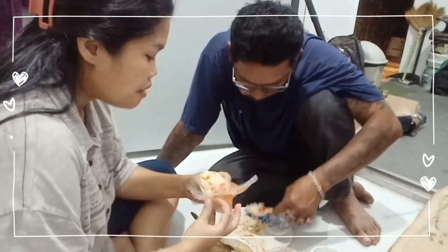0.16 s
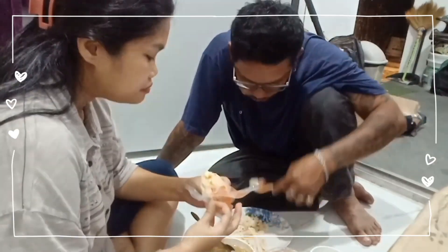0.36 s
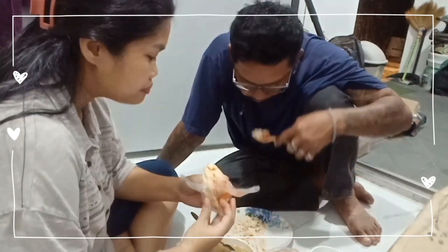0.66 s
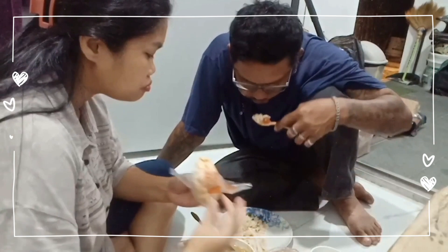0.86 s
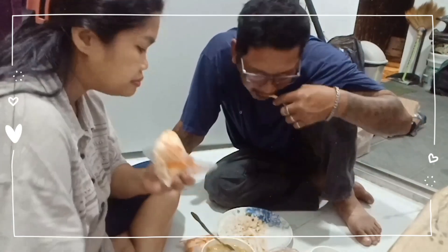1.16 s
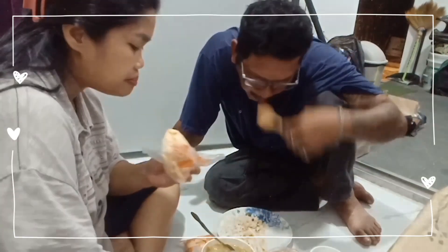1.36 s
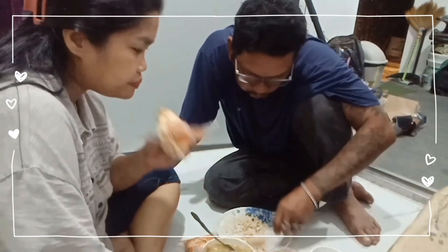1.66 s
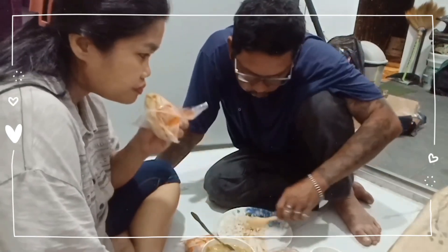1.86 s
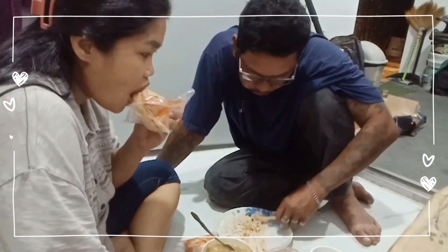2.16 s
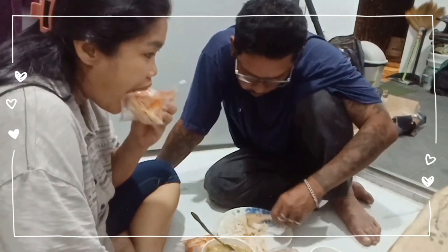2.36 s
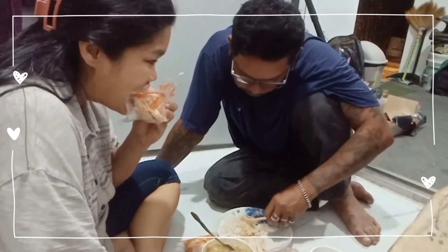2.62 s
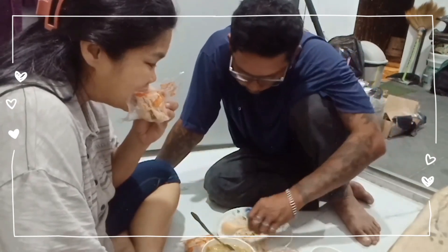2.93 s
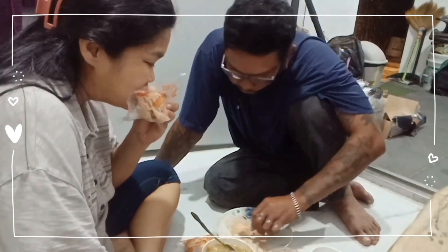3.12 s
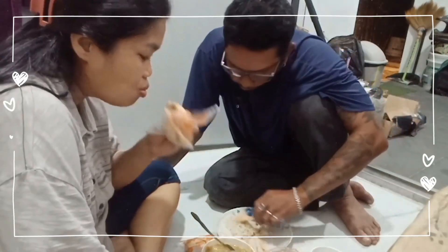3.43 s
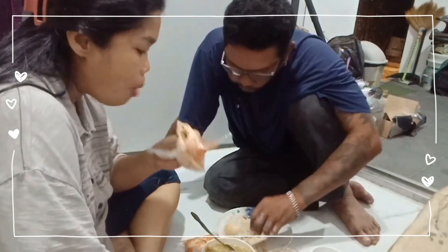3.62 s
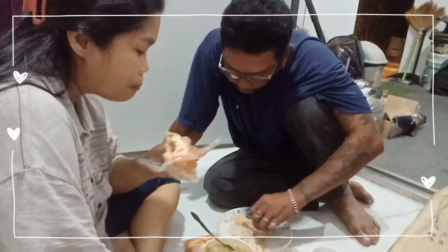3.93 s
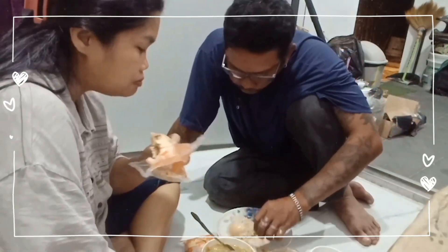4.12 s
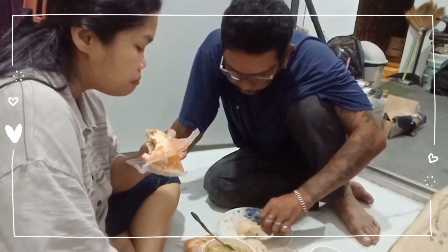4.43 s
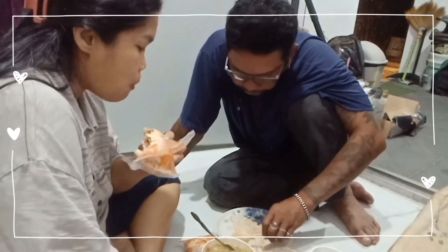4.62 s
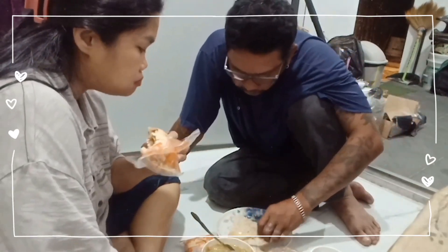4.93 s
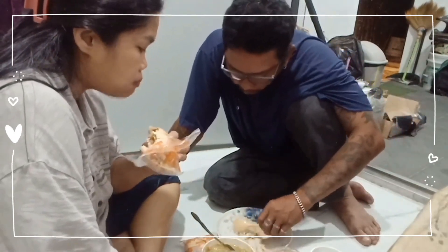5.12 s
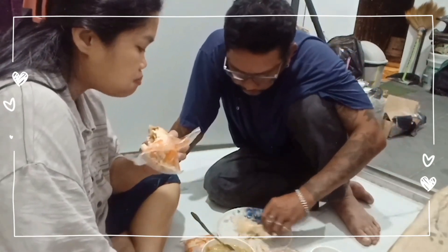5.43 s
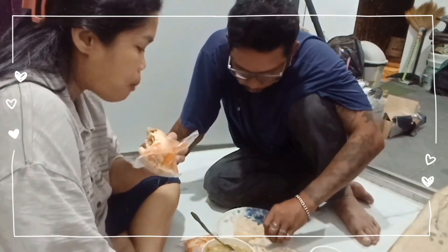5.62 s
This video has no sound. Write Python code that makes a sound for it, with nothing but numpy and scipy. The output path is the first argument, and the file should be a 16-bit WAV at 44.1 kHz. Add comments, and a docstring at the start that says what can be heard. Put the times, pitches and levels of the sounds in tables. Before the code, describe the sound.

A quiet indoor meal heard up close in a small room with a short reverberant tail. For the first second and a half, a paper wrapper crackles faintly in a hand, with small dry snaps and rustles. A soft spoon knock lands on a ceramic plate at about 1.8 s, followed by a clearer one at 2.3 and a few lighter taps around 2.5 to 2.7. Two crisp paper snaps come near 2.85, then tiny scrapes and a short, piercing squeak of metal on glaze at 3.25. After a sparse moment, a dull tap sounds at 3.9, light taps at 4.3 to 4.4, and a weaker squeak at 4.5. Harder, short, food-damped clinks follow at 4.85 and 5.1, the latter with a scrape, and the loudest at 5.5. Soft low bumps, slowly sinking rumble, faint hum, wavering thin whine and hiss remain behind.

```python
"""A metal spoon knocks, scrapes and squeaks on a ceramic plate damped by food, on the floor of a small room:
blows and tiny slips ring the plate's modes, and stick-slip gives the squeaks their harmonics.
Nearer the microphone a paper wrapper crackles in a hand: snapping creases briefly ring its facets.
Close walls return a short tail. Behind lie soft low bumps and rumble (noise in low bands), a throbbing
hum, a faint wavering whine (sines in their own band of noise) and soft hiss."""
import sys
import numpy as np
from scipy import signal
from scipy.fft import rfft, irfft
from scipy.io import wavfile

SR = 44100
rng = np.random.default_rng(int(sys.argv[2]) if len(sys.argv) > 2 else 0)


def waveform_to_disk(signal):
    """Save audio, clipped to [-1, 1], as 16-bit WAV at the path in sys.argv[1]."""
    frames = np.transpose(np.atleast_2d(signal))
    scaled = np.clip(frames, -1, 1) * 32767
    samples = np.round(scaled).astype(np.int16)
    wavfile.write(sys.argv[1], SR, samples)


N = 254898


def undb(db):
    """Decibels to gain."""
    return 10 ** (np.asarray(db) / 20)


def level(x, db):
    """Scale to an rms level."""
    return x * undb(db) / np.sqrt(np.mean(x ** 2))


def unit(x):
    """Scale to an energy of one."""
    return x / np.sqrt(np.sum(x ** 2))


def seconds(length):
    """Time axis of a short sound."""
    return np.arange(max(int(length * SR), 8)) / SR


def add(track, start_s, x):
    """Mix x into the track from start_s."""
    i = max(int(start_s * SR), 0)
    track[i:i + len(x)] += x[:max(N - i, 0)]


def colour(x, points, size=2048):
    """Minimum-phase filter through (hz, db) points, straight lines over log frequency."""
    hz, db = np.transpose(points)
    grid_hz = np.maximum(np.arange(size // 2 + 1) * SR / size, 1)
    gain = undb(np.interp(np.log(grid_hz), np.log(hz), db))
    # folding the cepstrum forward in time makes the filter causal
    cepstrum = irfft(np.log(gain))
    cepstrum[1:size // 2] *= 2
    cepstrum[size // 2 + 1:] = 0
    impulse = irfft(np.exp(rfft(cepstrum)))
    return signal.fftconvolve(x, impulse)[:len(x)]


def resonance(x, hz, q):
    """Band-pass with gain one at its centre."""
    b, a = signal.iirpeak(min(hz, .45 * SR), q, fs=SR)
    return signal.lfilter(b, a, x)


def walk(rate, size):
    """Random path with a spread near one: straight lines between draws, rate draws a second."""
    at = np.arange(size) * rate / SR
    count = int(at[-1]) + 2
    return np.interp(at, np.arange(count), rng.standard_normal(count))


def swell(t, edge=0.48):
    """A stroke that fades in and out over the given share of its length."""
    return signal.windows.tukey(len(t), min(2 * edge, 1))


def grains(t, rate, spread_db):
    """Tiny slips at random moments, rate a second, a few much larger than the rest."""
    size = undb(spread_db * np.minimum(rng.exponential(size=len(t)), 4))
    happens = rng.random(len(t)) < rate / SR
    return happens * size * rng.standard_normal(len(t))


def contact(chatter_s, spike_db=-8, bite_s=0.003):
    """Force of a blow: a first touch, then a chatter that bites and dies."""
    t = seconds(.06)
    envelope = np.exp(-t / chatter_s) * (1 - np.exp(-t / bite_s))
    chatter = unit(grains(t, 9000, 1) * envelope)
    touch = undb(spike_db) * (t == 0)
    # a longer chatter carries more of the blow
    return touch + np.sqrt(chatter_s / 0.00038) * chatter


def plate(force, low_db, mid_db, treble_db, crack_db=-1, place_db=2.5, detune=0.0077):
    """The plate answers a force: the place of contact weights its modes, the spoon's load detunes them."""
    # plate and spoon ring together: pitch_hz, level_db, t60_s
    modes = [(1237, -7.5, 0.018), (1467, -8.5, 0.066), (1672, -6.5, 0.067), (1830, -11.5, .04),
             (1984, -12.5, 0.06), (2443, -4.5, 0.068), (2710, 8, 0.035), (2890, 2.5, 0.017),
             (3165, -4, 0.022), (3580, -15, 0.01), (3920, -4, 0.02), (4000, -8, 0.042), (4420, 0, 0.017),
             (4970, -22, 0.057), (5276, -8, 0.027), (5500, -21.5, 0.041), (5945, -14.5, 0.0225),
             (6480, -22.5, 0.02), (7970, -24, 0.025), (8263, -10, 0.016), (9130, -25, .03),
             (11400, -36, .04)]
    # the dry crack of the contact: pitch_hz, level_db
    crack_colour = [(100, -59.5), (400, -58), (600, -15.5), (900, -12.5), (1400, -1), (2700, 11),
                    (4500, -2.5), (6500, -14), (8700, -18), (10000, -37.5), (14000, -24.5), (16000, -35)]
    t = seconds(.15)
    hz, db, t60_s = np.transpose(modes)[:, :, None]
    hz = hz * (1 + detune * rng.standard_normal(hz.shape))
    weight = undb(db + place_db * rng.standard_normal(db.shape))
    weight = weight * rng.choice([-1, 1], db.shape)
    decay = undb(-60 * t / t60_s)
    ring = np.sum(weight * np.sin(2 * np.pi * hz * t) * decay, axis=0)
    # a small plate radiates next to nothing below its first mode
    ring = signal.sosfilt(signal.butter(3, 900, "high", fs=SR, output="sos"), ring)
    crack = colour(1. * (t == 0), crack_colour)
    sound = signal.fftconvolve(force, unit(ring) + undb(crack_db) * unit(crack))
    # the spoon's hard edge brings out the treble, its soft touch through food the low modes
    return unit(colour(sound, [(1400, low_db), (2700, 0), (4500, mid_db), (8500, treble_db)]))


def knocks(rebound_mid_db=-6.5, rebound_treble_db=-5):
    """The spoon strikes and falls back once, softer to the touch and so duller; returns direct and wall sound."""
    # blow and rebound: start_s, level_db, chatter_s, rebound_after_s, rebound_db,
    # low_db, upper_mid_db, treble_db, room_db
    blows = [(1.808, -39, 0.0018, 0.008, -2, 19, 4, 5, -8),
             (2.2914, -30.5, 0.002, 0.024, -6, 10, 13.5, 23, -4),
             (2.525, -43.5, 0.0016, .008, -14, 24, -15, 13, -13),
             (2.6759, -34.5, 0.0037, .011, -3, 11, 12, 23.5, -8.5),
             (2.728, -36, .01, 0.012, -7, 6, 14.5, 13.5, -7),
             (3.871, -40.5, 0.0088, 0.012, 1, 19, 5.5, -2, -8),
             (4.32, -44.5, 0.0043, 0.023, -12, 10.5, 4.5, -4, -2.5),
             (4.407, -37, 0.003, 0.012, -8, -12, 16, 9, -6.5),
             (4.846, -21.5, 0.0022, 0.014, -11, 9.5, 3, 9, 1),
             (5.1247, -24.5, 0.0022, .011, -1.5, 4.5, 8, 5, -8.5),
             (5.5017, -14.5, 0.001, .003, 1.5, -3.5, 9, 3.5, -8)]
    direct, walls = np.zeros(N), np.zeros(N)
    for start_s, db, chatter_s, rebound_s, rebound_db, low_db, mid_db, treble_db, room_db in blows:
        blow = plate(contact(chatter_s), low_db, mid_db, treble_db)
        rebound = plate(contact(chatter_s), low_db, mid_db + rebound_mid_db, treble_db + rebound_treble_db)
        # the level is an rms over 4.1 ms
        strength = undb(db) * np.sqrt(0.0041 * SR)
        for at_s, sound in (start_s, blow), (start_s + rebound_s, undb(rebound_db) * rebound):
            add(direct, at_s, strength * sound)
            add(walls, at_s, strength * sound * undb(room_db))
    return direct, walls


def scrapes():
    """The spoon drags over glaze and crumbs: dense slips ring the plate."""
    # drags: start_s, length_s, level_db, low_db, upper_mid_db, treble_db
    drags = [(1.56, 0.05, -70, -16, 27, -4), (1.835, 0.1, -61, -20, 3, 21), (2.336, 0.35, -71, 11, 7, 24.5),
             (2.728, 0.061, -57.5, -8, 16, 32), (2.962, 0.051, -56, 3, 0, 12.5),
             (3.191, 0.057, -54.5, -15, 14.5, 17), (3.965, .099, -54.5, 10, 12, 20),
             (4.419, 0.1, -56, 2, 11, 18.5), (4.611, 0.0096, -56.5, 16, -4, 21),
             (5.156, 0.064, -41, 6, -2, 7), (5.2, 0.041, -43, 3, 8.5, 9.5)]
    out = np.zeros(N)
    for start_s, length_s, db, low_db, mid_db, treble_db in drags:
        t = seconds(length_s)
        slips = swell(t) * grains(t, 2900, 3.8)
        add(out, start_s, undb(db) * np.sqrt(len(t)) * plate(slips, low_db, mid_db, treble_db))
    return out


def squeaks(jitter=.017, rough_db=3.5, dulling_db_per_s=154.5, mellowing=0.39):
    """Stick-slip locks on a plate mode; under a hard grip its second harmonic meets the strongest ring."""
    # the spoon's edge sticks and slips on the glaze, one path a squeak: time_s, slip_rate_hz, level_db
    paths = [
        [(1.851, 1467, -60), (1.875, 1441, -55.5), (1.918, 1468, -69)],
        [(3.247, 1259, -26.5), (3.253, 1312, -19), (3.267, 1377, -17), (3.275, 1416, -17), (3.282, 1406, -46),
         (3.291, 1363, -37), (3.304, 1363, -28), (3.318, 1370, -56)],
        [(4.368, 1590, -65), (4.375, 1550, -66), (4.381, 1590, -72)],
        [(4.494, 1353, -52), (4.502, 1333, -33), (4.511, 1316, -36.5), (4.519, 1350, -21.5), (4.527, 1365, -36),
         (4.552, 1339, -45.5), (4.59, 1345, -69)],
        [(5.174, 1370, -64), (5.186, 1384, -39), (5.195, 1436, -38.5), (5.213, 1400, -50)],
    ]
    # tone of each squeak beside its second harmonic: fundamental_db, third_harmonic_db, overtones_db, grit_db
    tones = [(-25, -5, -12, -9), (-13.5, -13.5, -7, -14), (16, -7, -22, -11), (-6.5, -12, -24, -13),
             (4, -19, -10.5, -3)]
    # upper harmonics of the slip, before overtones_db is added: multiple, level_db
    overtones = [(4, -7.5), (5, -17), (6, -14), (7, -32.5), (8, -37)]
    out = np.zeros(N)
    for path, (fundamental_db, third_db, overtones_db, grit_db) in zip(paths, tones):
        times, slip_hz, levels = np.transpose(path)
        start_s, t = times[0], seconds(times[-1] - times[0])
        db = np.interp(start_s + t, times, levels)
        # no two slips last equally long or are equally strong, which smears the upper harmonics most
        hz = np.interp(start_s + t, times, slip_hz) * (1 + jitter * walk(996, len(t)))
        phase = 2 * np.pi * np.cumsum(hz) / SR
        # the fundamental gains on the rest as the grip eases: mellowing is dB per dB
        fundamental = undb(fundamental_db + mellowing * (db.max() - db))
        tone = fundamental * np.sin(phase) + np.sin(2 * phase)
        # the upper harmonics fade as the edge settles
        dulling = undb(-dulling_db_per_s * t)
        # 3.1 rounds to the third harmonic and sets its phase smear
        partials = [(3.1, third_db)] + [(k, d + overtones_db) for k, d in overtones]
        for k, partial_db in partials:
            strength = dulling * undb(partial_db + 3 * walk(700, len(t)))
            smear = k / 8 * walk(1000, len(t))
            tone += strength * np.sin(round(k) * phase + smear)
        grip = undb(db + rough_db * walk(300, len(t))) * swell(t, edge=.05)
        add(out, start_s, np.sqrt(2) * grip * tone)
        grit = plate(grip * grains(t, 6000, 3.63), 0, 4.8, 2.6)
        add(out, start_s, undb(grit_db) * np.linalg.norm(grip) * grit)
    # the plate sings on after a squeak
    return out + undb(-12) * resonance(out, hz=3000, q=1100)


def paper(force, ring_hz, ring_db, treble_db, facet_q=5):
    """A snapping crease briefly rings the facet of paper next to it."""
    # colour of the paper: pitch_hz, level_db
    paper_colour = [(300, -26), (1200, -1), (2200, 4.5), (3200, 7.5), (5200, 2.5), (7000, -0.5),
                    (8800, 4.5), (10000, -12.5), (13500, -1), (16000, -23)]
    force = np.pad(force, (0, 512))
    facet = undb(ring_db) * resonance(force, ring_hz, facet_q)
    sound = colour(force + facet, paper_colour)
    return unit(colour(sound, [(4500, 0.014), (9000, treble_db)]))


def wrapper(facet_db=8, snap_s=.0013):
    """Single creases snap; between them the paper rustles in swarms of small ones."""
    # the sharpest creases, level over 2.5 ms: start_s, level_db, ring_hz, ring_db, treble_db
    snaps = [(.2033, -49.5, 4120, 13, 8.5), (0.4066, -49, 5000, -2, 4), (.6, -47, 3250, -3, -3),
             (0.704, -47, 3730, -2, -7), (0.7403, -48.5, 3240, 0, 4), (.863, -48, 8500, 1, 3),
             (0.9412, -46.5, 2400, 20, -8), (2.8435, -33, 2970, 29, 13.5),
             (2.8638, -32.5, 5140, 14.5, 10.5), (2.9438, -44.5, 2760, 18, 19.5),
             (2.972, -42.5, 2770, 25, 7.5), (3.126, -46, 4000, 16, 5.5), (3.4166, -39.5, 2730, -20, -7)]
    # the wrapper shifts and rustles: start_s, length_s, level_db, ring_hz, treble_db
    rustles = [(0.067, 0.041, -64, 5100, 7), (0.381, 0.045, -58, 6860, 3), (.45, 0.047, -60.5, 7160, 4),
               (0.585, 0.051, -60, 4000, -1), (0.658, 0.099, -63, 3380, -11), (.79, 0.068, -57, 4340, 0),
               (0.994, 0.056, -61, 4440, 4), (1.114, 0.068, -51, 3930, -7), (1.442, 0.068, -55, 5100, 1.5),
               (3.639, 0.062, -64.5, 4000, 4)]
    out = np.zeros(N)
    t = seconds(.01)
    for start_s, db, ring_hz, ring_db, treble_db in snaps:
        burst = rng.standard_normal(len(t)) * np.exp(-t / snap_s)
        snap = paper(burst, ring_hz, ring_db, treble_db)
        add(out, start_s, undb(db) * np.sqrt(0.0025 * SR) * snap)
    for start_s, length_s, db, ring_hz, treble_db in rustles:
        t = seconds(length_s)
        creases = swell(t, edge=.4) * grains(t, 1500, 4.5)
        rustle = paper(creases, ring_hz, facet_db, treble_db)
        add(out, start_s, undb(db) * np.sqrt(len(t)) * rustle)
    return out


def fidget(spread_db=3, facet_db=7, burst_db=5, bursts_per_s=18):
    """Fingers keep working the wrapper, and small creases give way in random bursts."""
    start_s, length_s, fidget_db = .05, 1.1, -70
    creases_per_s, ring_hz, treble_db = 600, 3900, 1
    t = seconds(length_s)
    creases = grains(t, creases_per_s, spread_db)
    bursts = undb(burst_db * np.clip(walk(bursts_per_s, len(t)), -2, 1))
    out = np.zeros(N)
    add(out, start_s, level(paper(creases * bursts, ring_hz, facet_db, treble_db), fidget_db))
    return out


def room(x, build_s=0.0085, late_db=-37):
    """Close walls return a dense, short tail whose treble dies first; a faint one lingers."""
    t60_s, treble_t60_s, late_t60_s = 0.2, 0.17, .8
    t = seconds(.5)
    noise = rng.standard_normal(len(t))
    low = signal.sosfilt(signal.butter(1, 4000, fs=SR, output="sos"), noise)
    fall = np.log(1000) * t  # 60 dB
    tail = low * np.exp(-fall / t60_s) + (noise - low) * np.exp(-fall / treble_t60_s)
    tail += undb(late_db) * low * np.exp(-fall / late_t60_s)
    build_up = 1 - np.exp(-(t / build_s) ** 2)
    return signal.fftconvolve(x, unit(tail * build_up))[:N]


def bumps(q=3.1):
    """Soft, dull bumps, each a short swell of noise around one low pitch."""
    # bumps: start_s, length_s, pitch_hz, level_db
    thuds = [(.538, 0.044, 412, -59.5), (1.482, 0.063, 593, -54.5), (1.704, 0.044, 332, -55),
             (2.257, 0.098, 446, -58), (2.408, 0.054, 290, -58.5), (2.705, 0.022, 250, -55.5),
             (5.157, 0.074, 600, -59), (5.609, .066, 308, -58)]
    out = np.zeros(N)
    for start_s, length_s, hz, db in thuds:
        t = seconds(length_s)
        push = np.pad(swell(t) * rng.standard_normal(len(t)), (0, 2048))
        thud = resonance(resonance(push, hz, q), hz, q)
        add(out, start_s, undb(db) * np.sqrt(len(t)) * unit(thud))
    return out


def rumble(patchy_db=4, swell_db=0.3, start_db=-56.5, sink_db_per_s=0.64):
    """Low room noise swells as a whole and sinks slowly while its bands rise and fall on their own."""
    # its colour: pitch_hz, density_db (per Hz, relative)
    rumble_colour = [(20, -10), (50, -7.5), (90, 10.5), (165, -4.5), (320, 0.5), (420, -4), (600, 0),
                     (730, -12.5), (1000, -14.5), (2000, -33), (6000, -60.5)]
    bands = np.zeros(N)
    for hz in np.arange(40, 1100, 50):
        band = resonance(rng.standard_normal(N), hz, hz / 50)  # 50 Hz wide
        bands += band * undb(patchy_db * walk(14, N))
    db = swell_db * walk(8, N) - sink_db_per_s * np.arange(N) / SR
    return level(colour(bands, rumble_colour, size=8192), start_db) * undb(db)


def hum(centre_hz=84, hum_db=-72.5, throb_db=2, throbs_per_s=5):
    """A low sine drifts in pitch and swells and sinks at random."""
    hz = centre_hz * (1 + .09 * walk(30, N))
    tone = np.sin(2 * np.pi * np.cumsum(hz) / SR)
    return level(tone * undb(throb_db * walk(throbs_per_s, N)), hum_db)


def whine(hiss_db=-60.5, waver=0.00301, flutter_db=2.5):
    """High sines waver together in pitch and flutter apart in level, within a band of noise."""
    # the whine: pitch_hz, level_db (rms)
    partials = [(1714, -62), (3428, -78.5)]
    # colour of the hiss around it: pitch_hz, level_db (relative)
    hiss_colour = [(1100, -12.5), (1480, -6), (1650, 12.5), (1800, 9), (2030, 3.5), (2200, -38),
                   (3000, -31)]
    turn = 2 * np.pi * np.cumsum(1 + waver * walk(60, N)) / SR
    tones = np.zeros(N)
    for hz, db in partials:
        tones += level(np.sin(hz * turn) * undb(flutter_db * walk(30, N)), db)
    return tones + level(colour(rng.standard_normal(N), hiss_colour), hiss_db)


def air(air_db=-60.5):
    """Soft room hiss: coloured noise whose level flickers slightly."""
    # colour of the hiss: pitch_hz, density_db (per Hz, relative)
    air_colour = [(20, -17), (800, 1.5), (1450, 1.5), (2300, -3.5), (3200, -8), (4000, -10.5), (6000, -15),
                  (6900, -13.5), (7600, -17), (8300, -12.5), (9300, -17.5), (10200, -34), (15500, -15.5)]
    hiss = colour(rng.standard_normal(N), air_colour)
    return level(hiss * undb(1.5 * walk(14.0, N)), air_db)


def scene(squeak_room_db=-5, scrape_room_db=-2, paper_room_db=-6):
    """Plate and wrapper share the room; the wrapper is closer and drier."""
    blows, walls = knocks()
    scrape, squeak = scrapes(), squeaks()
    crackle = wrapper() + fidget()
    walls = walls + undb(squeak_room_db) * squeak + undb(scrape_room_db) * scrape
    walls = walls + undb(paper_room_db) * crackle
    near = blows + scrape + squeak + crackle
    background = bumps() + rumble() + hum() + whine() + air()
    return (near + room(walls) + background)[None]


def record(dry):
    """The microphone dulls the treble and the recorder cuts the top."""
    # response of the microphone: pitch_hz, level_db
    microphone = [(9000, -0.5), (11500, -4), (12300, -12.5), (13600, -17.5), (14300, -12.5), (16000, -24)]
    heard = colour(dry[0], microphone)
    top_cut = signal.ellip(8, .2, 70, 15400, fs=SR, output="sos")  # low-pass at 15.4 kHz
    return signal.sosfilt(top_cut, heard)[None]


dry = scene()
out = record(dry)
waveform_to_disk(out)
```